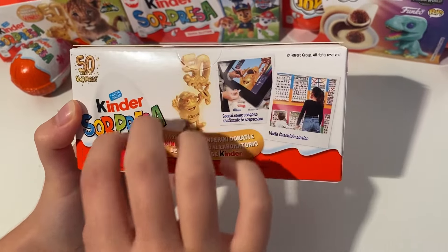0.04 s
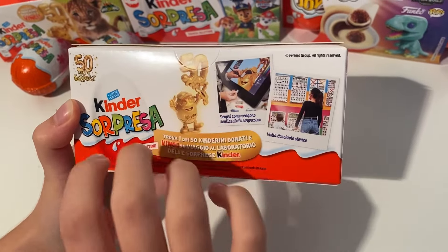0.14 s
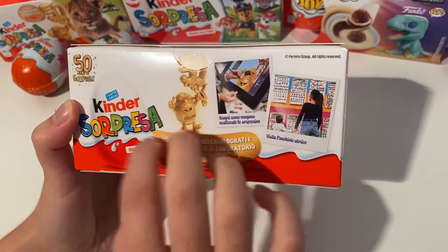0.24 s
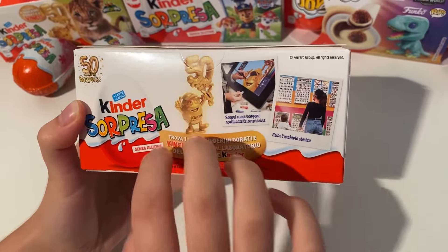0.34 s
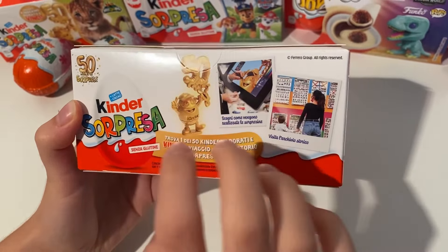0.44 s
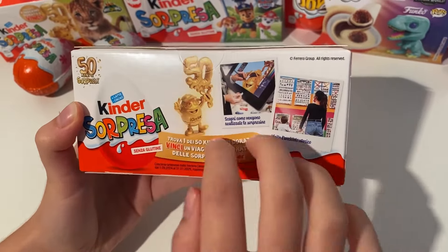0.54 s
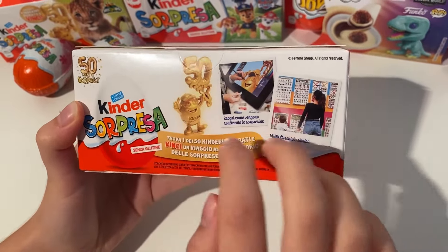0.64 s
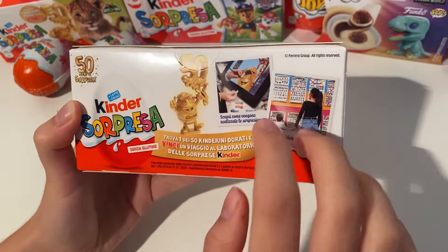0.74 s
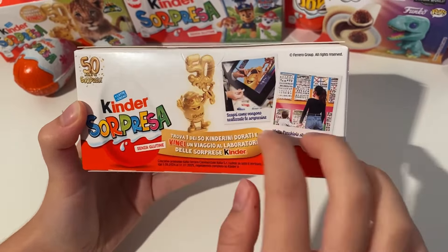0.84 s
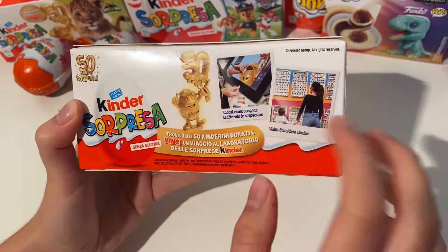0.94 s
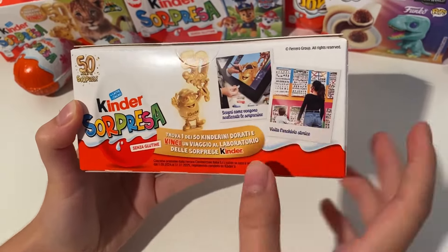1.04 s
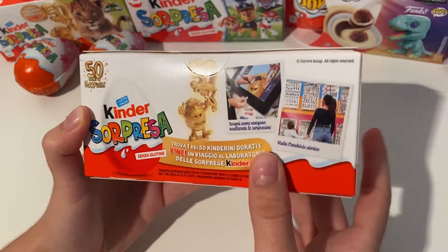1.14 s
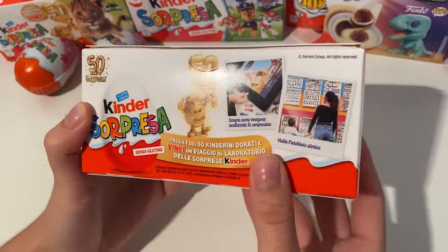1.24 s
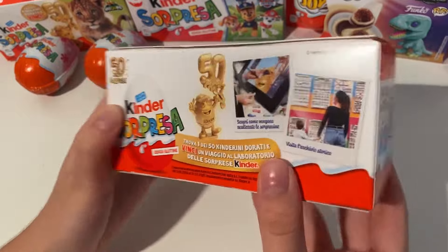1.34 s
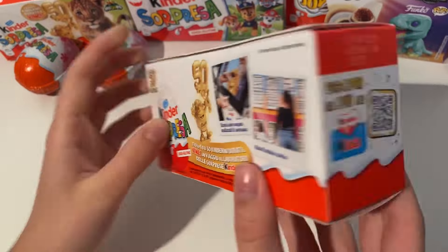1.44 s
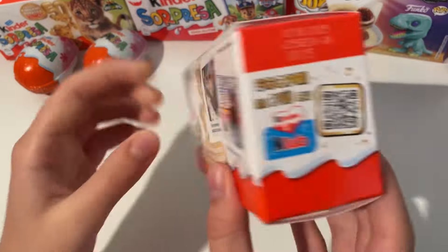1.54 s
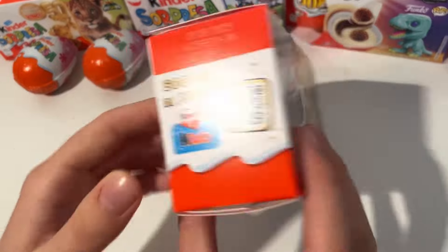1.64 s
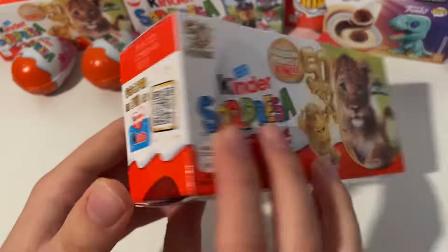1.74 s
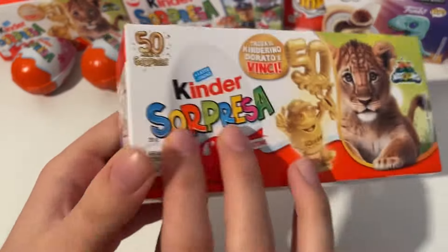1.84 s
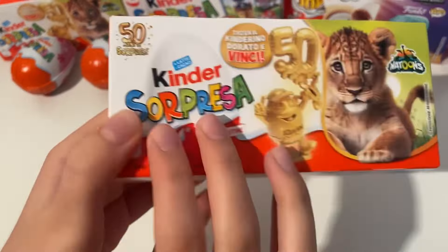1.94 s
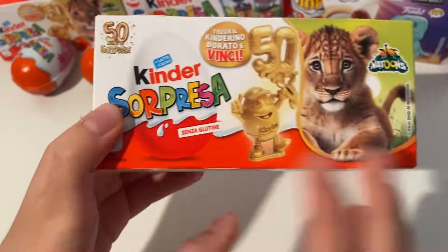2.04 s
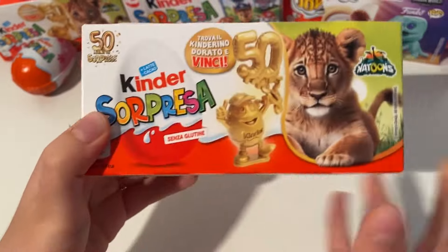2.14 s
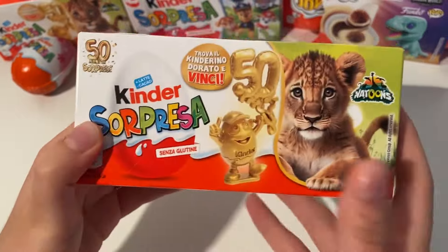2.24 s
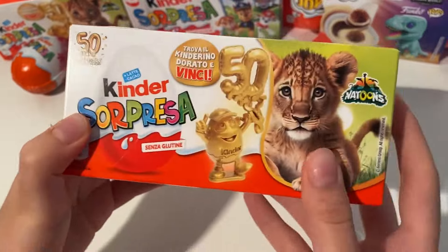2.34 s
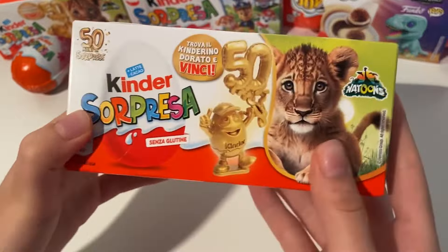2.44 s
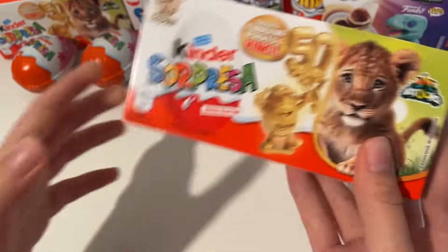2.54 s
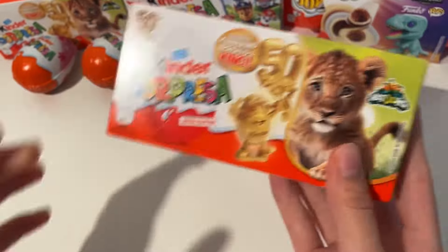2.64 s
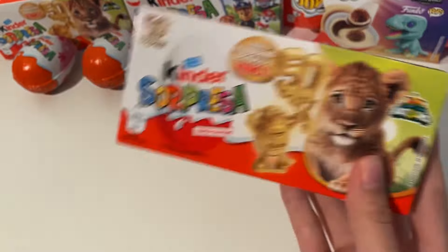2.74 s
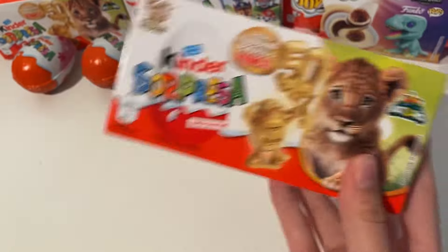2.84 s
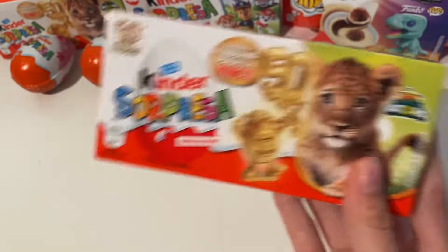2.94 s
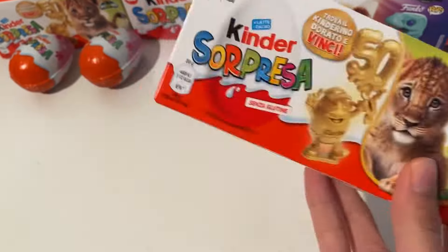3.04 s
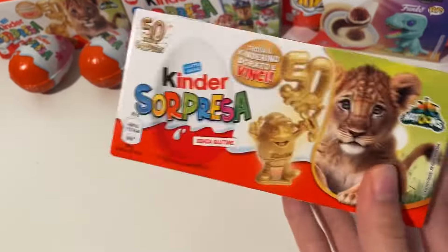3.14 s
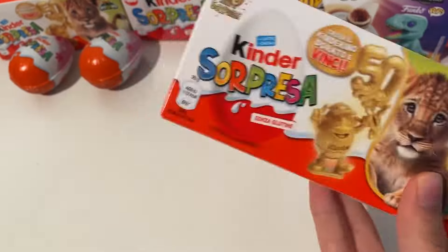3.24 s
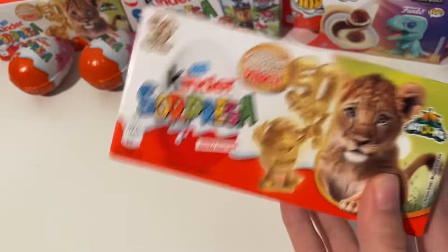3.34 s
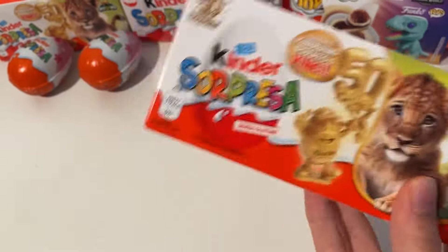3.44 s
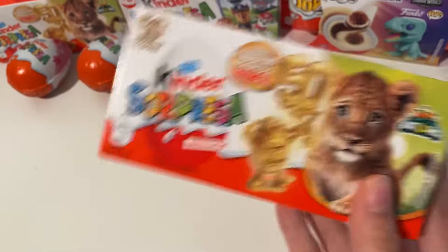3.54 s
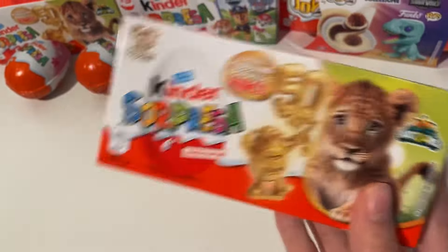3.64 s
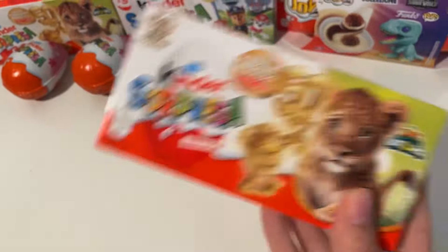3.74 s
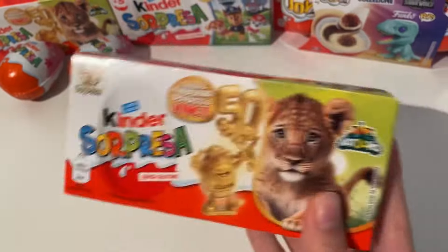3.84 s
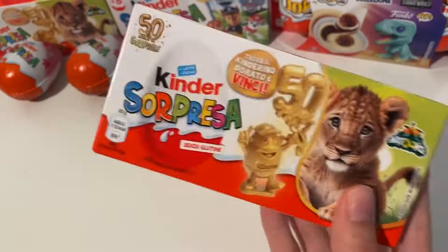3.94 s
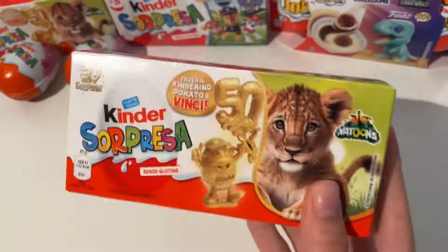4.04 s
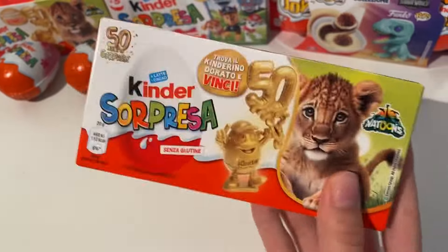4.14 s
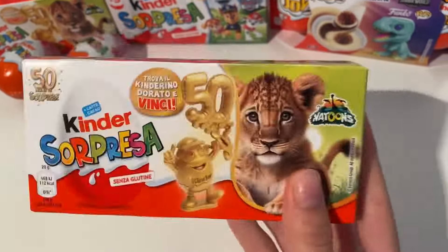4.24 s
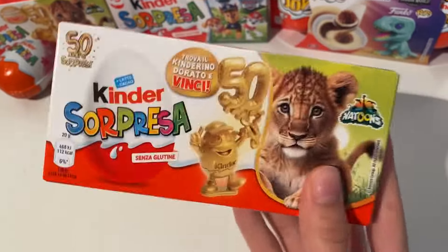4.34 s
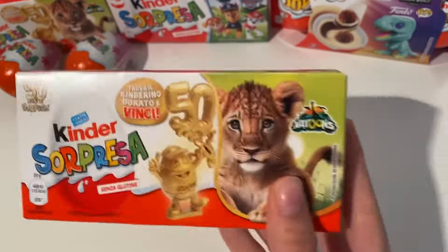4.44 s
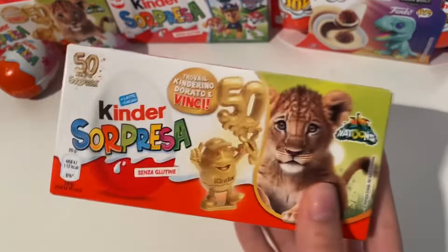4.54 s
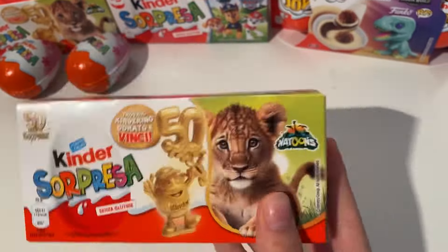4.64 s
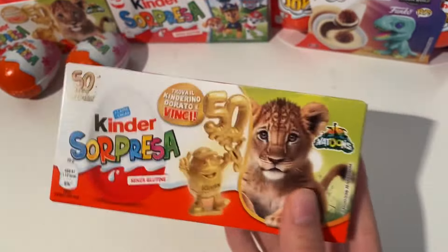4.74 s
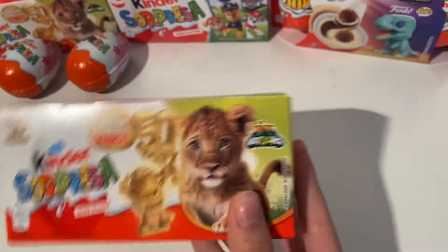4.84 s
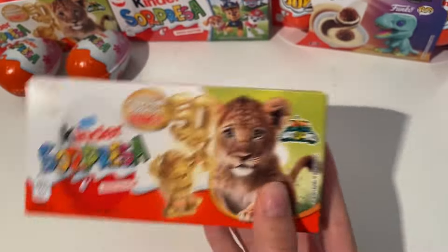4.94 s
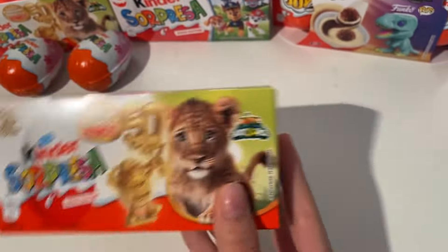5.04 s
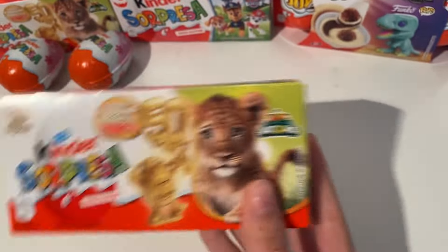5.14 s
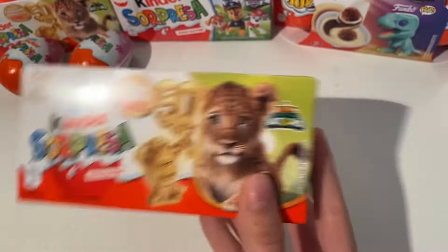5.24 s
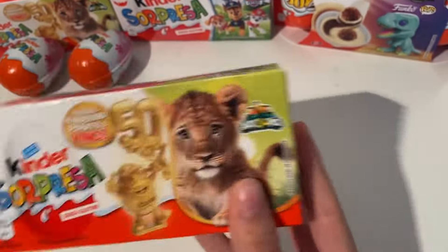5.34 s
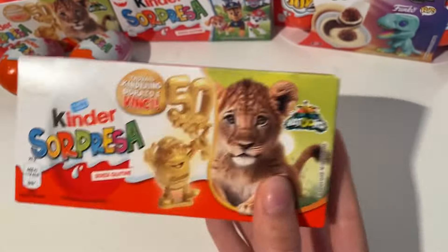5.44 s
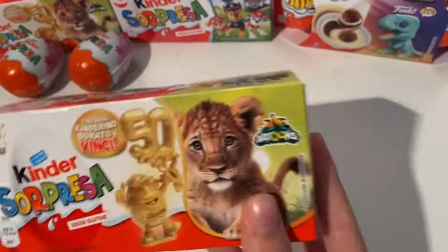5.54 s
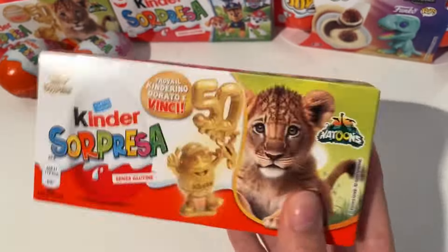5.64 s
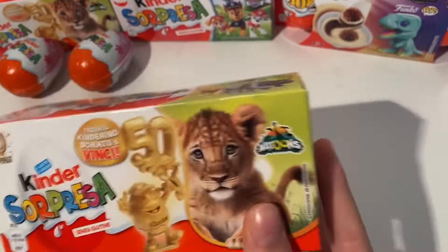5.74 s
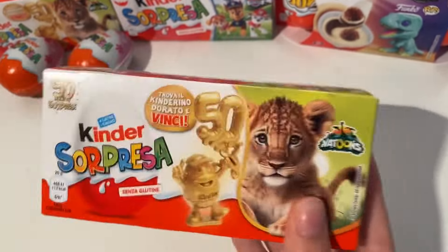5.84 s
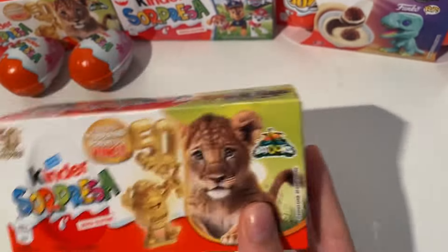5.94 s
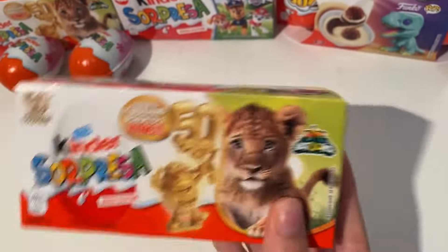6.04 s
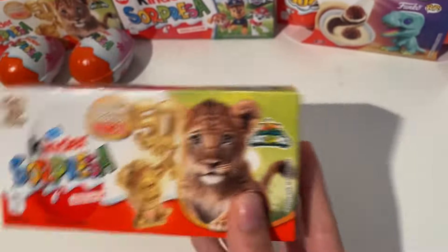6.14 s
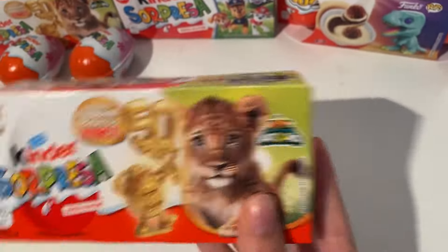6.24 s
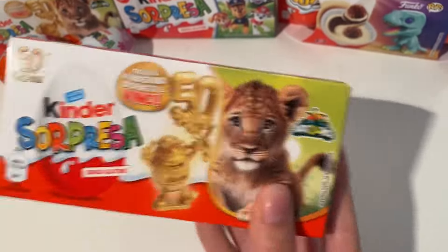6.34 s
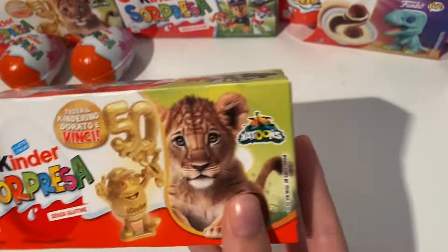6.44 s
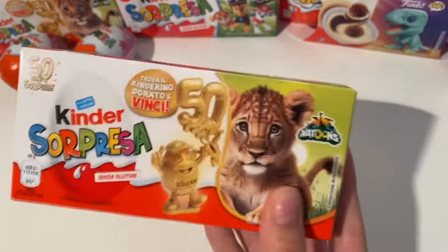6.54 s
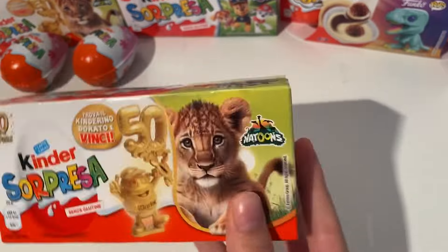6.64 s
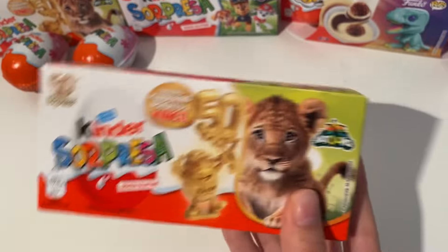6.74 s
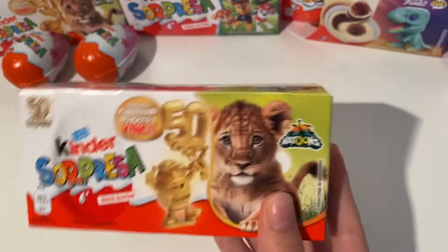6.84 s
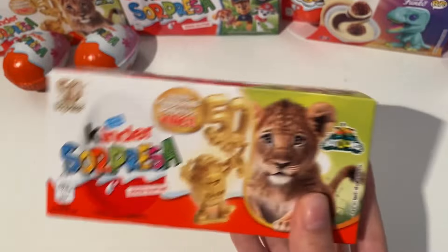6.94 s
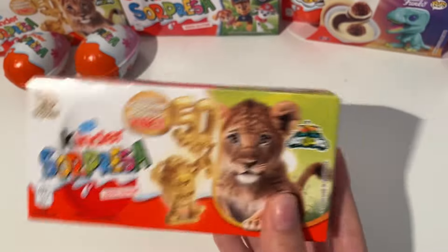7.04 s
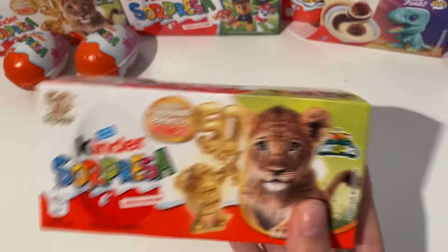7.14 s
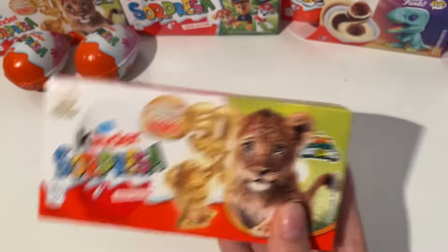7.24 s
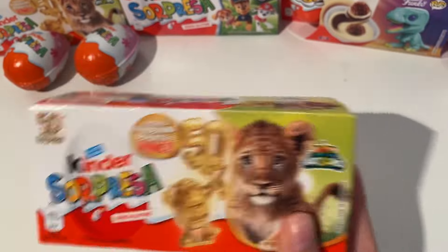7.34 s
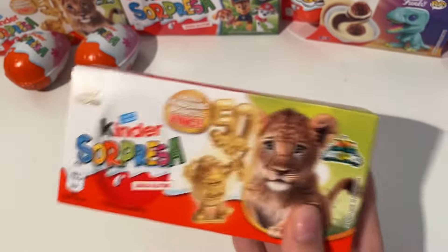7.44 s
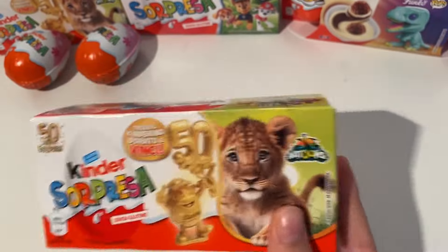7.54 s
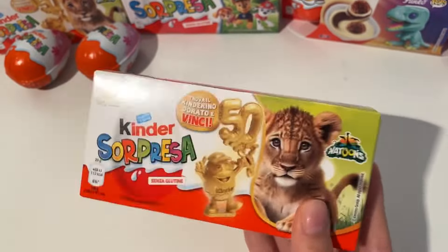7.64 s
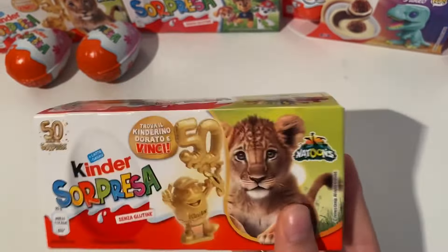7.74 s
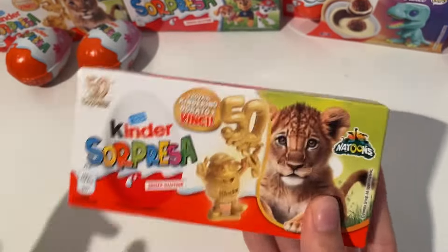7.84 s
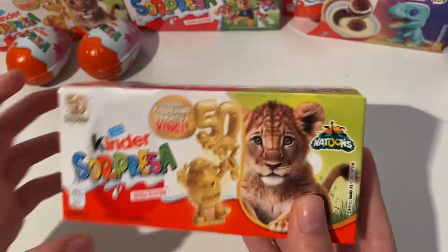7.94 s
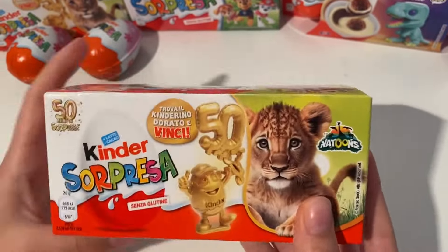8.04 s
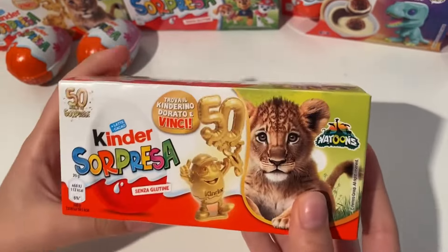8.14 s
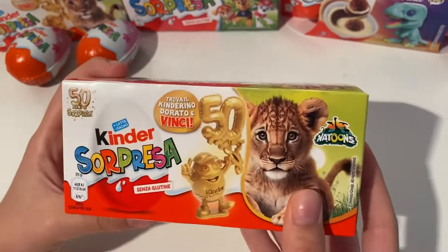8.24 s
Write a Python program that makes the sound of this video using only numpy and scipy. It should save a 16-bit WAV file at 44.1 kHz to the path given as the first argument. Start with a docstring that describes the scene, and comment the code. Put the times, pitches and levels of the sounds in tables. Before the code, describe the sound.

Close to the microphone in a quiet room, fingernails drum three times on a thin cardboard box. The box is turned over, with a soft rub of fingers and light knocks from the hollow eggs inside. Then it is shaken to and fro for several seconds, the eggs sliding, rattling, clacking together and knocking against the walls before they settle.

```python
"""In a quiet room, fingernails touch a thin cardboard box of loose hollow eggs, then drum on it three times.
From 1 s the box is turned over: fingers rub the card and the eggs shift. From 2.5 s to 8 s it is shaken
to and fro: the eggs slide, rattle, clack together and knock on the walls. Each blow is a click plus
ringing shells, panels and walls. A close two-port microphone hears it all."""
import sys
import numpy as np
from scipy import signal
from scipy.fft import rfft, irfft, next_fast_len
from scipy.io import wavfile
from scipy.ndimage import uniform_filter1d

SR = 44100
rng = np.random.default_rng(int(sys.argv[2]) if len(sys.argv) > 2 else 0)


def digitize_waveform(pressure):
    """Quantize a signal to 16-bit integers and store it at the path in sys.argv[1].

    Rows of a 2-D input are taken as channels; values are limited to [-1, 1].
    """
    field = np.atleast_2d(pressure).T
    bounded = np.clip(field, -1, 1)
    quanta = np.round(bounded * 32767).astype(np.int16)
    wavfile.write(sys.argv[1], SR, quanta)


N = 366030

# modes of the eggs and the card they touch: f/Hz, level/dB, t60/s
SHELL_MODES = [(728, -12, 0.025), (919, 1, 0.038), (1073, 6, 0.015), (1230, 6, .02), (1341, 1, 0.025),
               (1520, -1, 0.014), (1880, -50.5, 0.0057), (2296, -6, 0.028)]
# modes of the card panels: f/Hz, level/dB, t60/s
PANEL_MODES = [(243.7, -0.5, 0.042), (305.2, 3, 0.032), (340, 1.5, 0.024), (434, 1, 0.039),
               (558.4, -3, 0.044), (638.4, 10.5, 0.019)]
# hard contact: f/Hz, density/dB
CLICK_SPECTRUM = [(300, -9), (880, -4), (1500, 1), (2030, -3.5), (2800, -7.5), (3700, -10.5), (4800, -13.5),
                  (6890, -18), (8950, -32), (11600, -29.5), (13200, -23.5), (15200, -44), (16500, -57)]
# egg motion: t/s, sliding level/dB, treble gain/dB, cap on the rattle from one blow/dB
SHAKING = [(.8, -102, 6.5, -44.5), (2.3, -76, -6.5, -57), (2.5, -54, 8.5, -42.5), (3.0, -50.5, 3, -31),
           (3.8, -48.5, 1, -31), (4.2, -42.5, 1.5, -36.5), (4.5, -46.5, 3.5, -31.5), (5.0, -48, 2, -30),
           (5.8, -46, 3, -32), (6.5, -49, 2, -30), (7.2, -47, 0.5, -30.5), (7.7, -49.5, 3.5, -33),
           (8.07, -59, 7.5, -47.5), (8.18, -99, 27, -63)]


def gain_of(db):
    """Decibels to amplitude."""
    return 10 ** (np.asarray(db) / 20)


def unit_rms(x):
    """Scales to rms 1."""
    return x / np.sqrt(np.mean(x ** 2) + 1e-20)


def read(points, hz):
    """Interpolates a table over log frequency."""
    f, value = np.transpose(points)
    return np.interp(np.log(hz + 1), np.log(f + 1), value)


def add(mix, at_s, sound):
    """Mixes a sound in at at_s."""
    part = mix[..., round(at_s * SR):][..., :sound.shape[-1]]
    part += sound[..., :part.shape[-1]]


def colour(x, spectrum):
    """Minimum-phase filter of unit energy."""
    hz = abs(np.fft.fftfreq(8192, 1 / SR))
    log_gain = np.log(gain_of(np.maximum(read(spectrum, hz), -80)))
    taps = np.fft.ifft(np.exp(np.conj(signal.hilbert(log_gain)))).real[:2048]
    return signal.oaconvolve(np.atleast_2d(x), taps[None] / np.linalg.norm(taps), axes=1)[:, :N]


def near(modes, hz, db_per_oct):
    """A blow rings mostly the modes near its own pitch."""
    return [(f, db + db_per_oct * abs(np.log2(f / hz)), t60) for f, db, t60 in modes]


def ring(modes, scatter, size, spread_db, rise_s=0.0031, detune=0.078, skew_rad=0.35):
    """Decaying sines; each blow lands elsewhere, so pitch, weight and port phase scatter."""
    t = np.arange(size) / SR
    hz, db, t60_s = np.transpose(modes)
    pitch, weight, side = scatter[:, :len(modes)]
    poles = 2j * np.pi * hz * (1 + detune * pitch) - np.log(1000) / t60_s
    ports = gain_of(db + spread_db * weight) * np.exp(1j * np.outer([1, -1], skew_rad * side))
    sound = (ports @ np.exp(np.outer(poles, t))).imag * (1 - np.exp(-t / rise_s))
    return np.sqrt(2) * sound / abs(sound).max()


def hush():
    """Still room air, partly shared by both ports."""
    spectrum = [(25, -4), (60, 4), (120, -2), (400, -26), (900, -32), (2000, -31), (4500, -40), (7500, -35),
                (10000, -45), (13300, -30.5), (15200, -32), (16500, -53)]  # f/Hz, density/dB
    air = colour(rng.standard_normal((3, N)), spectrum)
    return gain_of(-63.5) * unit_rms(air[0] + 0.5 * air[1:])


def every_blow():
    """All impacts: t/s, shell/dB, shell f/Hz, wall/dB, panel/dB, panel f/Hz, click/dB, kind."""
    nails = [(0.0, -58, 1200, -43, -38, 573, -31.5), (0.019, -40, 1160, -68, -56, 420, -42),
             (0.2302, -28.5, 1340, -34, -29.5, 334, -26), (0.2356, -22, 1350, -34, -32, 343, -28.5),
             (0.2542, -26.5, 790, -43, -37.5, 460, -27.5), (0.287, -41.5, 1120, -51, -42, 340, -55),
             (0.519, -27, 1240, -34, -23, 373, -16.5), (0.529, -18.5, 1130, -33.5, -41, 330, -29),
             (0.535, -37, 1200, -41, -27, 358, -46), (0.558, -41, 1200, -43, -37, 368, -55),
             (0.7601, -45, 790, -39, -26, 343, -55), (0.765, -24, 1160, -40, -27.5, 252, -22),
             (0.778, -49, 800, -27, -32, 387, -24.5), (0.783, -28, 744, -33.5, -31, 260, -33),
             (0.809, -38, 1490, -44, -46, 250, -50), (2.221, -51, 1200, -48, -46, 300, -53),
             (2.23, -34.5, 1190, -41.5, -43, 445, -38), (2.253, -54, 1200, -48, -45, 330, -46)]  # fingernail on card: columns as above, without kind
    knocks = [(1.27, -35.5, 1150, -69, -45.5, 430, -35.5), (1.345, -33, 1300, -52, -41.5, 530, -39),
              (1.499, -28.5, 740, -43, -39, 480, -35.5), (1.634, -30, 1080, -37.5, -39.5, 450, -31),
              (1.648, -30, 1150, -61, -46, 520, -34), (1.835, -44.5, 1090, -43.5, -48, 320, -50),
              (1.983, -49, 820, -48, -50, 290, -37), (2.474, -37, 1090, -59, -35, 520, -33),
              (2.522, -18, 1160, -41, -27, 586, -32.5), (2.561, -31, 1120, -45, -56, 440, -40),
              (2.697, -13, 1120, -42, -26, 600, -26), (2.807, -30, 1170, -40, -37.5, 440, -30),
              (2.916, -10.5, 1040, -32.5, -24, 565, -27), (3.019, -26, 1240, -36, -39, 380, -50),
              (3.032, -38, 1080, -35, -32.5, 413, -48), (3.154, -10.5, 1230, -32, -24, 520, -21.5),
              (3.244, -30, 1070, -69, -52, 320, -31), (3.377, -10, 1150, -30, -25, 500, -22),
              (3.466, -30, 1080, -41, -46, 400, -30.5), (3.596, -11.5, 1210, -37, -34.5, 410, -23.5),
              (3.701, -22, 970, -36, -28, 370, -27.5), (3.814, -12, 1140, -44, -27.5, 557, -23),
              (3.926, -24, 1230, -40, -31, 370, -28.5), (4.051, -13, 1180, -43, -20.5, 600, -21.5),
              (4.143, -24, 1170, -40, -35, 440, -30), (4.276, -18.5, 1030, -44, -27.5, 503, -34),
              (4.348, -25, 1030, -62, -45, 390, -27.5), (4.356, -21.5, 1170, -31.5, -34, 310, -28),
              (4.464, -16.5, 1230, -33, -27, 425, -36), (4.553, -25, 840, -30, -41, 480, -30.5),
              (4.668, -17.5, 1310, -42, -22, 497, -29.5), (4.764, -21.5, 1400, -33, -27, 272, -25),
              (4.872, -22, 1240, -36, -25.5, 497, -50), (4.983, -19, 1540, -42, -30.5, 280, -30),
              (5.084, -16, 1030, -36, -28.5, 514, -30.5), (5.203, -18.5, 1530, -35.5, -34, 308, -28.5),
              (5.318, -12, 993, -41.5, -25.5, 510, -22.5), (5.433, -19.5, 1400, -27, -24.5, 335, -25.5),
              (5.543, -17, 880, -47, -27, 490, -46), (5.645, -15, 1080, -29, -28, 340, -23.5),
              (5.75, -11.5, 1124, -31.5, -24.5, 520, -24), (5.863, -23, 1080, -29.5, -29, 300, -20.5),
              (5.982, -14, 1240, -39.5, -30, 500, -24.5), (6.055, -41, 1050, -62, -59, 420, -58),
              (6.091, -18, 1320, -27, -24.5, 370, -26), (6.201, -17, 1210, -35, -26, 550, -23.5),
              (6.295, -43, 1050, -59, -48, 340, -39), (6.323, -10.5, 1060, -25, -25, 347, -23.5),
              (6.441, -16, 1280, -39, -27.5, 400, -27), (6.554, -12, 1380, -26, -28.5, 320, -25.5),
              (6.642, -24, 1080, -40, -28, 390, -44), (6.667, -17, 1340, -39, -26.5, 570, -29),
              (6.779, -11, 1630, -24.5, -20.5, 310, -23.5), (6.894, -15.5, 1280, -38, -29, 278, -28),
              (6.989, -21.5, 1300, -30, -23.5, 432, -22.5), (7.106, -23.5, 1340, -47, -29, 483, -27),
              (7.203, -16.5, 1040, -32, -29, 460, -20), (7.315, -23, 1140, -44, -27.5, 480, -41),
              (7.423, -16, 1450, -35, -21.5, 435, -20.5), (7.532, -25.5, 1290, -38.5, -26.5, 537, -32.5),
              (7.644, -18.5, 1520, -34, -30, 330, -28.5), (7.766, -32.5, 1315, -41, -39, 312, -30.5),
              (7.879, -25.5, 1530, -36.5, -30.5, 320, -27.5), (8.037, -31.5, 1220, -46.5, -37.5, 556, -38)]  # egg thrown against an end wall: columns as nails
    clacks = [(.371, -55, -68), (.704, -53.5, -74), (0.968, -57, -63), (1.014, -67, -56), (1.097, -59, -53),
              (1.114, -69, -61), (1.165, -61, -65), (1.186, -45, -50), (1.361, -42, -60), (1.42, -45, -62),
              (1.427, -38.5, -62), (1.465, -49, -57), (1.587, -43, -50), (1.606, -36, -50),
              (1.747, -59, -58.5), (1.785, -67, -55.5), (1.963, -39.5, -48), (2.011, -52, -65),
              (2.113, -70, -72), (2.173, -63, -61), (1.562, -49, -72), (2.241, -48, -50),
              (2.282, -45.5, -64), (2.289, -47, -52), (2.33, -48, -49), (2.395, -57, -50),
              (2.319, -47, -58), (2.338, -47, -47), (2.418, -45, -45), (2.446, -29.5, -45),
              (2.45, -33, -34), (2.781, -30.5, -36), (2.681, -55, -63), (2.717, -30, -42),
              (2.795, -30, -44), (2.904, -31, -53), (2.929, -18.5, -22), (2.978, -35, -42), (3, -35, -39),
              (3.014, -30, -35), (3.045, -33.5, -52), (3.257, -27, -35), (3.366, -54, -44),
              (3.601, -13, -26), (3.711, -29, -45), (3.782, -44, -36), (3.905, -33, -53), (3.942, -27, -31),
              (4.112, -35, -40), (4.299, -38, -36), (4.061, -18, -26), (4.171, -27.5, -37),
              (4.279, -20, -39), (4.472, -33, -49), (4.58, -27.5, -57), (4.676, -26, -29),
              (4.741, -29, -43), (4.876, -20.5, -27), (4.964, -33, -40), (5.091, -43, -54),
              (5.098, -30.5, -45), (5.561, -40, -51), (5.701, -36, -53), (5.727, -29, -33.5),
              (5.802, -38, -44), (5.888, -29.5, -48), (6.077, -34, -35), (6.218, -30, -33),
              (6.35, -29.5, -39), (6.576, -31, -38), (7.176, -43, -50), (7.193, -38, -42),
              (7.325, -21, -28), (7.334, -38, -32), (7.351, -33, -43), (7.56, -36, -50), (7.91, -42, -35.5),
              (8.025, -47, -54), (8.147, -74, -53), (8.202, -74, -57), (5.187, -29.5, -39),
              (5.413, -27, -61), (5.55, -17.5, -28.5), (5.632, -32, -35), (5.84, -31, -53),
              (6.536, -30, -38), (6.965, -32, -63), (6.977, -42, -64), (7.015, -29, -64), (7.1, -23, -34),
              (7.229, -30, -54), (7.271, -49, -35.5), (7.412, -24, -46), (7.491, -43, -33),
              (7.546, -33, -36), (7.623, -27.5, -33), (7.848, -31, -58), (8.006, -32.5, -57),
              (8.114, -48.5, -60), (8.124, -63, -42), (8.213, -61, -57), (8.236, -66, -35.5),
              (8.251, -55, -56), (8.279, -61, -50)]  # egg on egg: t/s, shell/dB, click/dB
    bumps = [(1.256, -42, 408, -53), (1.317, -44, 323, -38), (1.859, -44, 406, -43), (1.887, -67, 390, -53),
             (1.933, -46.5, 275, -51), (2.66, -28, 450, -46), (2.604, -37.5, 350, -55),
             (2.879, -31, 350, -55), (2.891, -31.5, 270, -51), (3.116, -26.5, 438, -54),
             (3.268, -30, 466, -38), (3.338, -28, 276, -55), (3.474, -28, 426, -46), (3.493, -34, 444, -40),
             (3.565, -27.5, 314, -54), (3.691, -42, 443, -51), (3.786, -23, 303, -48),
             (4.011, -28.5, 350, -50), (4.223, -27, 293, -42), (4.39, -35, 350, -55),
             (4.584, -48, 350, -56), (5.564, -46, 350, -52), (5.666, -27, 390, -50), (5.771, -34, 340, -48),
             (6.805, -27, 355, -52), (7.097, -40, 350, -55), (4.429, -26.5, 276, -48),
             (4.634, -25.5, 440, -51), (4.846, -26, 413, -43), (5.063, -24.5, 434, -45),
             (5.287, -25, 437, -52), (5.506, -29, 434, -39), (5.944, -27, 430, -31.5),
             (6.106, -31.5, 454, -48), (6.166, -26.5, 303, -51), (6.409, -23, 436, -46),
             (6.859, -25.5, 435, -38), (7.073, -24, 430, -33), (7.285, -25.5, 433, -48),
             (7.508, -29, 435, -50), (7.722, -30, 423, -51), (7.757, -29.5, 307, -51),
             (7.952, -28.5, 390, -51)]  # egg landing softly, flat on a panel: t/s, panel/dB, panel f/Hz, click/dB
    rows = [(*nail, "nail") for nail in nails] + [(*knock, "knock") for knock in knocks]
    rows += [(s, db, 1080, db - 20, db - 14, 420, click, "clack") for s, db, click in clacks]
    rows += [(s, db - 11.5, 1090, db - 11.5, db, hz, click, "bump") for s, db, hz, click in bumps]
    return rows


def click(hiss, click_db, panel_over_shell_db):
    """Contact noise: a snap, then grainy chatter. Weak or flat blows start softly."""
    t = np.arange(hiss.shape[1]) / SR
    flatness = gain_of(min(panel_over_shell_db, 12))
    weakness = np.clip((-20 - click_db) / 15, 0, 1)
    onset = 1 - np.exp(-t / (0.00036 + 0.00048 * flatness + 0.00055 * weakness))
    snap = gain_of(-60 * t / 0.0075)
    grain_db = 4.7 * unit_rms(uniform_filter1d(hiss[0, ::-1], size=50))
    chatter = gain_of(-10.5 - 60 * t / 0.047 + grain_db)
    return gain_of(click_db) * (hiss[0] + 0.59 * hiss[1:]) * (snap + chatter) * onset


def blows():
    """Each impact clicks and rings shell, panels and walls."""
    rim_modes = [(2280, -1.5, 0.021), (2768, 0, 0.018), (3264, -0.5, 0.016), (3990, -1.5, 0.013),
                 (4885, -5, 0.011)]  # high modes of the thin shell: f/Hz, level/dB, t60/s
    wall_modes = [(79.2, -1.5, 0.12), (97.5, 2.5, 0.081), (150.7, -6.5, 0.071), (185, 4.5, 0.066)]  # box walls: f/Hz, level/dB, t60/s
    shell_rise_s = {"nail": 0.0009, "knock": 0.0014, "clack": 0.0019, "bump": 0.0017}
    panel_db_per_oct = {"nail": -15, "knock": -10, "clack": -7, "bump": -27.5}
    contact_s, bump_damp_db_per_s = 0.00061, -900
    t = np.arange(5000) / SR
    punch = 1 + gain_of(-4) * np.exp(-t[:2000] / 0.0019)  # first swing stands out during contact
    wall_lag = 1 - np.exp(-t / 0.0013)  # heavy walls answer late
    body, clicks = np.zeros((2, N)), np.zeros((2, N))
    rows = every_blow()
    scatters = rng.standard_normal((len(rows), 4, 3, 8))
    hisses = rng.standard_normal((len(rows), 3, SR // 20))
    for row, scatter, hiss in zip(rows, scatters, hisses):
        at_s, shell_db, shell_hz, wall_db, panel_db, panel_hz, click_db, kind = row
        shell = ring(near(SHELL_MODES, shell_hz, db_per_oct=-33), scatter[0], size=2000,
                     spread_db=1.5, rise_s=shell_rise_s[kind], detune=0.015, skew_rad=0.4)
        panel = ring(near(PANEL_MODES, panel_hz, panel_db_per_oct[kind]), scatter[1], size=3500,
                     spread_db=3.5, rise_s=0.0078, detune=0.048, skew_rad=0.22)
        wall = ring(wall_modes, scatter[2], size=5000,
                    spread_db=6, rise_s=0.023, detune=0.034, skew_rad=0.15)
        rim = ring(rim_modes, scatter[3], size=1200,
                   spread_db=8, rise_s=0.00046, detune=0.055, skew_rad=0.69)
        damp_db = bump_damp_db_per_s * (kind == "bump") * t[:3500]  # the egg stays on the panel
        add(body, at_s + contact_s, gain_of(shell_db - 4.5) * punch * shell)
        add(body, at_s, gain_of(panel_db + damp_db) * panel)
        add(body, at_s, gain_of(wall_db) * wall_lag * wall)
        add(body, at_s, gain_of(click_db - 7) * rim)
        add(clicks, at_s, click(hiss, click_db, panel_db - shell_db))
    return body + colour(clicks, CLICK_SPECTRUM)


def tail(x):
    """Box hollow, table and room: sparse echoes of random sign, each band with its own decay."""
    decay = [(60, 0.11), (160, 0.055), (420, 0.26), (1100, 0.099), (1900, 0.18), (2910, 0.16), (5000, 0.12),
             (7680, 0.026)]  # box hollow and table: f/Hz, t60/s
    taps = np.zeros((2, SR // 2))
    slots = np.arange(100, SR // 2 - 20, 20)
    at = slots + rng.integers(0, 20, (2, len(slots)))
    np.put_along_axis(taps, at, rng.choice([-1., 1.], at.shape), 1)
    taps[1] = 0.34 * taps[0] + 1.4 * taps[1]  # ports partly alike
    hz, t, bands = signal.stft(taps, SR, nperseg=256)
    box_fade = gain_of(-60 * t / read(decay, hz)[:, None])
    room_fade = gain_of(-9 - 60 * t / 0.36)
    echo = signal.istft(bands * (box_fade + room_fade), SR, nperseg=256)[1]
    return signal.fftconvolve(x, echo / np.linalg.norm(echo, axis=1, keepdims=True), axes=1)[:, :N]


def stir(t60_s=0.12):
    """Rattle envelope: swells just before each blow, decays after it."""
    swell_s = {"nail": 0.0033, "knock": 0.0084, "clack": 0.0077, "bump": 0.0043}
    re_blow_db = {"nail": -3.5, "knock": -6, "clack": -13.5, "bump": -9.5}
    lead = SR // 20
    t = np.arange(-lead, SR // 4) / SR
    decay = gain_of(-60 * np.maximum(t, 0) / t60_s)
    shape = {kind: np.where(t < 0, gain_of(-3) * np.exp(np.minimum(t, 0) / tau_s), decay)
             for kind, tau_s in swell_s.items()}
    times_s, _, _, cap_db = np.transpose(SHAKING)
    power = np.zeros(N + lead)
    for at_s, shell_db, _, _, panel_db, _, _, kind in every_blow():
        rattle_db = min(max(shell_db, panel_db) + re_blow_db[kind], np.interp(at_s, times_s, cap_db))
        add(power, at_s, (gain_of(rattle_db) * shape[kind]) ** 2)
    return np.sqrt(power[lead:])


def slide(slips_per_s=300):
    """Sliding eggs: gritty slips of uneven size over a rubbing hiss."""
    sizes = gain_of(3 * np.minimum(rng.exponential(1, N), 3))
    slips = sizes * (rng.random(N) < slips_per_s / SR)
    grain = gain_of(-60 * np.arange(600) / SR / 0.011)
    grit = unit_rms(signal.oaconvolve(slips, grain)[:N])
    hiss = rng.standard_normal((3, N))
    return unit_rms((grit + 0.88) * (hiss[0] + 0.24 * hiss[1:]))


def bounces(hits_per_s=110, variants=16):
    """Small random knocks, each a shell and panel ring with a tick."""
    sizes = gain_of(3.5 * np.minimum(rng.exponential(1, N), 4))
    hits = sizes * (rng.random(N) < hits_per_s / SR)
    variant = rng.integers(0, variants, N)
    rings = np.zeros((2, N))
    for k, scatter in enumerate(rng.standard_normal((variants, 2, 3, 8))):
        shell = ring(SHELL_MODES, scatter[0], size=2000, spread_db=8.5)
        panel = ring(PANEL_MODES, scatter[1], size=2000, spread_db=2)
        knock = shell + gain_of(-9 + 12.7 * scatter[1, 0, -1]) * panel
        rings += signal.oaconvolve((hits * (variant == k))[None], knock, axes=1)[:, :N]
    t = np.arange(600) / SR
    tick = gain_of(-60 * t / 0.01) * (1 - np.exp(-t / 0.0007))
    hiss = rng.standard_normal((3, N))
    ticks = colour(signal.oaconvolve(hits, tick)[:N] * (hiss[0] + 0.45 * hiss[1:]), CLICK_SPECTRUM)
    return unit_rms(rings) + gain_of(-17.5) * unit_rms(ticks)


def rattle():
    """Eggs slide and bounce inside the box, moved by blows, turning and shaking."""
    spectrum = [(24, -13.5), (45, 8.5), (80, -1), (367, -2), (461, 3), (744, -8.5), (1050, -9),
                (1420, -8.5), (1750, -16.5), (2700, -21.5), (4000, -27), (7400, -29.5), (11600, -32.5),
                (15300, -37), (16500, -59)]  # sliding heard through the card: f/Hz, density/dB
    times_s, level_db, treble_db, _ = np.transpose(SHAKING)
    t = np.arange(N) / SR
    shaking = gain_of(np.interp(t, times_s, level_db))
    turning = gain_of(1.5) * rubbing(t)
    motion = np.hypot(shaking + turning, stir())
    sliding = colour(slide() * motion, spectrum)
    low = signal.sosfilt(signal.butter(2, 2000, fs=SR, output="sos"), sliding)
    treble = gain_of(np.interp(t, times_s, treble_db)) * (sliding - low)
    return 0.71 * low + treble + gain_of(-3.5) * motion * bounces()


def cracks(snap_t60_s=0.0045, fizz_t60_s=0.033):
    """A hard shell edge meets card or shell: a bright burst, then faint fizz."""
    events = [(0.2354, -37), (0.2554, -55), (0.2848, -54), (0.5195, -32), (0.7643, -33.5), (1.271, -46),
              (1.835, -51), (2.4445, -41), (2.4742, -41), (2.9254, -26.5), (3.1535, -50), (3.2423, -39),
              (3.385, -31), (3.465, -39), (3.6007, -37), (3.6974, -34), (3.924, -33), (4.061, -31),
              (4.141, -37), (4.2808, -38), (4.348, -31), (4.551, -36.5), (4.9813, -43), (5.204, -39),
              (5.3164, -43), (5.5488, -49), (5.863, -36), (5.98, -41), (6.0911, -48), (6.321, -36),
              (6.553, -37), (6.778, -35), (6.989, -33), (7.2035, -47), (7.3217, -36), (7.423, -34),
              (7.6435, -45), (8.0376, -43)]  # t/s, level/dB
    spectrum = [(2000, -19), (5000, -3), (8000, 16), (11500, 6), (15300, 4), (16500, -8)]  # f/Hz, density/dB
    t = np.arange(SR // 30) / SR
    envelope = gain_of(-60 * t / snap_t60_s) + gain_of(-12 - 60 * t / fizz_t60_s)
    bursts = np.zeros((2, N))
    for (at_s, db), hiss in zip(events, rng.standard_normal((len(events), 3, len(t)))):
        add(bursts, at_s, gain_of(db) * (hiss[0] + 0.037 * hiss[1:]) * envelope)
    return colour(bursts, spectrum)


def rubbing(t, edge_db=-16):
    """Envelope of fingers rubbing the card: each rub swells to its middle and fades."""
    rubs = [(1.138, 0.06, -60.5), (1.31, 0.077, -60), (1.367, 0.044, -56), (1.498, 0.033, -54.5),
            (1.656, 0.16, -70), (1.86, 0.16, -71), (1.766, 0.032, -73), (2, 0.096, -66),
            (2.233, 0.016, -52.5), (2.34, 0.1, -64.5), (8.237, 0.045, -97)]  # middle t/s, half length/s, level/dB
    return sum(gain_of(db + edge_db * abs(t - mid_s) / half_s) for mid_s, half_s, db in rubs)


def finger_swish():
    """Skin sliding on card: smooth hiss during each rub."""
    spectrum = [(300, -2), (1200, -1.5), (3000, -7), (6000, -11), (8500, -8.5), (12000, -11.5),
                (16500, -21.5)]  # f/Hz, density/dB
    hiss = rng.standard_normal((3, N))
    return colour((hiss[0] + 0.18 * hiss[1:]) * rubbing(np.arange(N) / SR), spectrum)


def scene():
    """Box sounds, their tail and the room."""
    box = blows() + rattle() + cracks() + finger_swish()
    return box + gain_of(-14.5) * tail(box) + hush()


def record(dry, low_hz=48, high_hz=16600):
    """Band-limited microphone whose two ports differ in level and phase."""
    balance = [(60, -2), (200, 5.5), (400, 1), (560, 1.9), (1000, 5.5), (1500, -0.3), (2200, -0.5),
               (2800, 4), (5700, 2.5), (8000, 0), (15000, 0.2)]  # f/Hz, left minus right/dB
    phase_lead = [(0, 0), (620, 0.8), (950, 0.1), (1550, 1.2), (1810, 1.9), (2070, 0.4), (2500, 0.3),
                  (2840, 0.7), (5080, -0.3), (6030, 0.2), (7410, -0.1), (8350, -2.8), (9560, -3.4),
                  (10400, -6.1), (11600, -6.4), (12500, -9.1), (13900, -9.6), (14600, -12.4),
                  (16500, -12.6)]  # f/Hz, lead of the left port/rad
    size = next_fast_len(N + 4096)
    hz = np.fft.rfftfreq(size, 1 / SR)
    left = gain_of(read(balance, hz) / 2) * np.exp(0.5j * read(phase_lead, hz))
    ports = irfft(rfft(dry, size) * np.array([left, 1 / left]), size)[:, :N]
    ports = signal.sosfilt(signal.butter(3, low_hz, "high", fs=SR, output="sos"), ports)
    lowpass = signal.firwin(511, high_hz, window=("kaiser", 9), fs=SR)
    return signal.oaconvolve(ports, lowpass[None], "same")


dry = scene()
out = record(dry)
digitize_waveform(out)
```